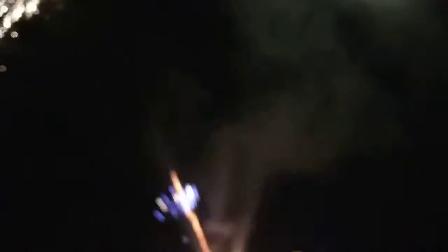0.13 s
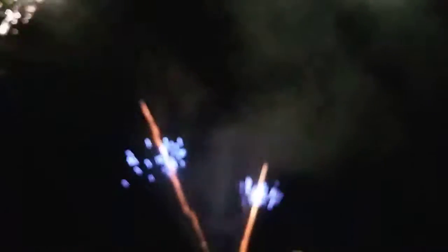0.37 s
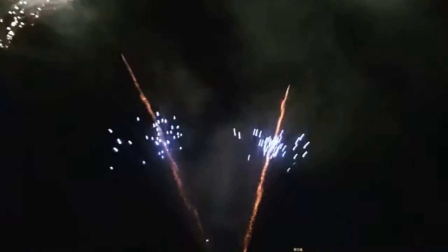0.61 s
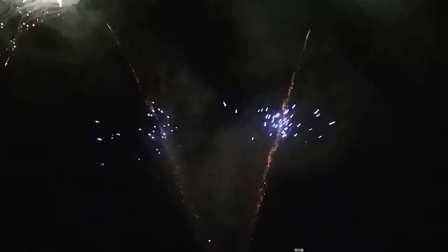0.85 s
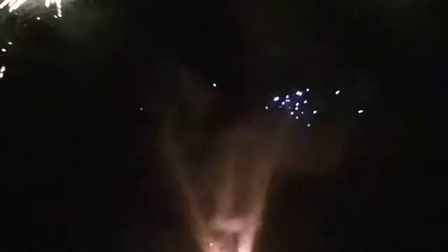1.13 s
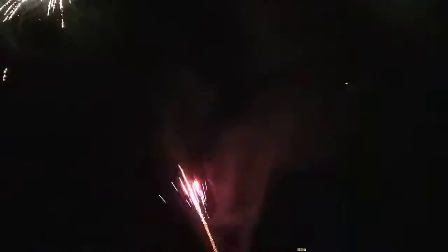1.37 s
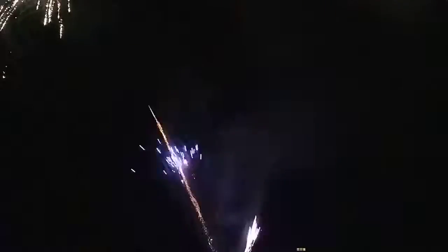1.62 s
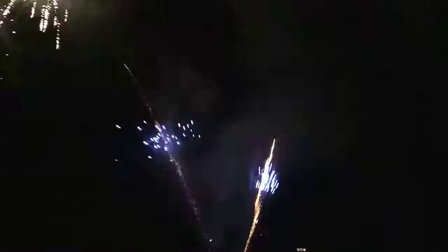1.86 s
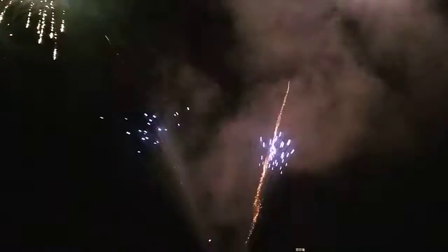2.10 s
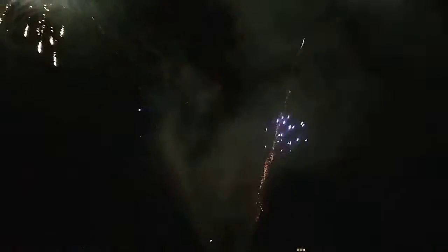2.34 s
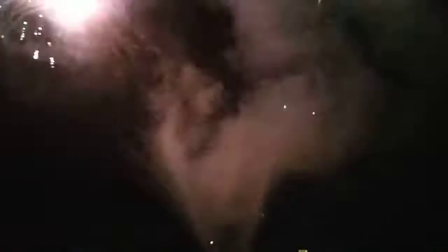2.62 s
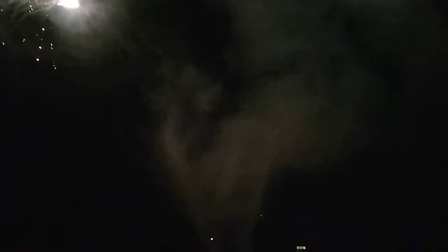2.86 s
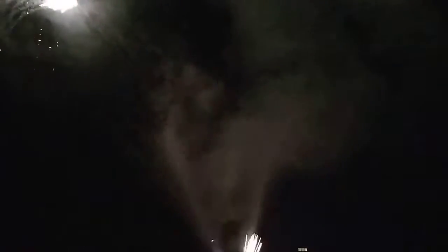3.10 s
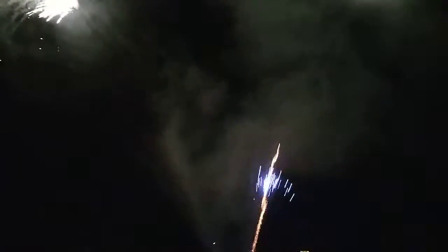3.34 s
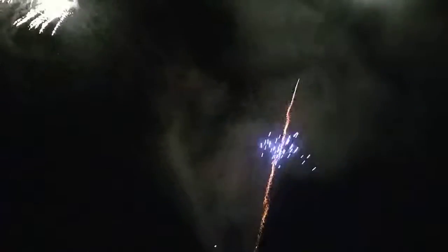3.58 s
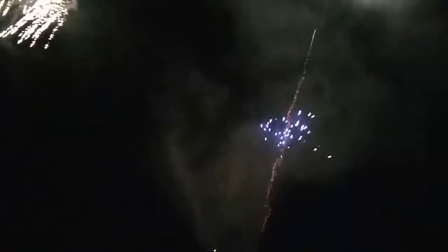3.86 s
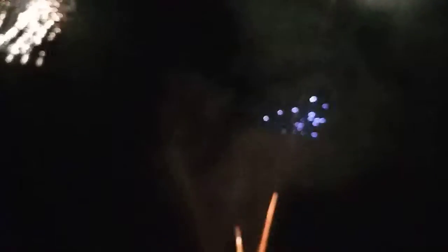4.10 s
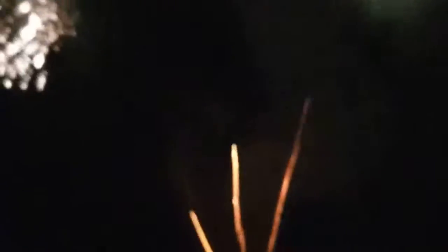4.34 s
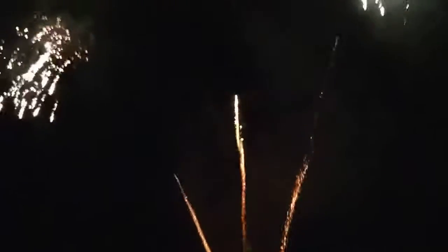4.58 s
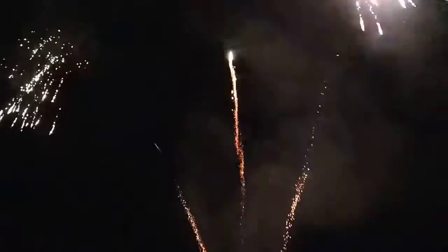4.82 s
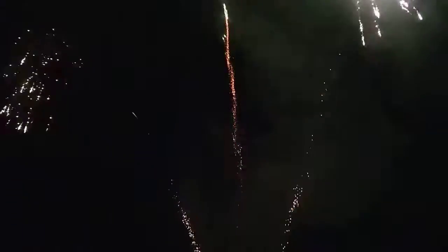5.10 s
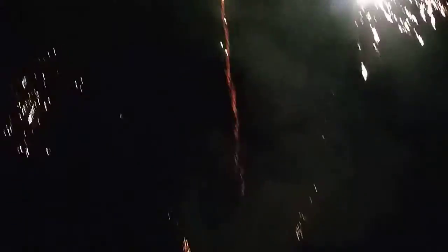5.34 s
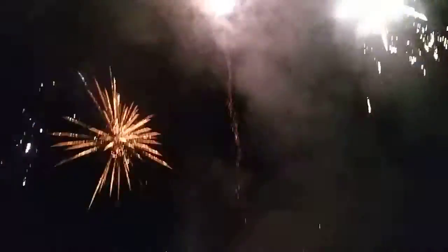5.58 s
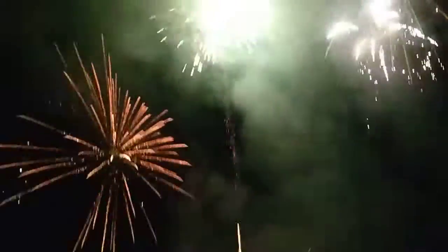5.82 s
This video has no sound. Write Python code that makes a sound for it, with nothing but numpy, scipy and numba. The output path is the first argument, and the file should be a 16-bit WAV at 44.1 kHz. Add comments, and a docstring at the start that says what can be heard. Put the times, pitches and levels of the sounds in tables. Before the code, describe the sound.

Outdoors at night, a phone tens of metres from firework mortars hears sharp, dry launch cracks with short thumps, each answered by clattering echoes from walls and trees. Single shots come first, with brief gritty fizzes and quiet gaps, then a tight cluster of launches near four seconds, faint distant pops, and finally overpowering overhead bangs that clip.

```python
"""Outdoors at night, some tens of metres from firework mortars, heard through a phone.
Each launch is a ringing crack of ragged noise with a low thump; each aerial burst is a steep shock front.
Walls, ground and trees answer every launch with one pattern of echoes and every burst with another:
banded noise, small rolling thumps and clear slaps. Gritty band noise hisses over a quiet, swelling night floor.
The phone cuts the bass, ducks the loudest shocks with a fast limiter and clips what is left."""
import sys
import numpy as np
from scipy import signal
from scipy.fft import rfft, irfft
from scipy.io import wavfile
from scipy.ndimage import uniform_filter1d
from numba import njit

SR = 44100
rng = np.random.default_rng(int(sys.argv[2]) if len(sys.argv) > 2 else 0)


def attenuation_scalar(level_db):
    """Turn a level in dB into a linear amplitude multiplier (20 dB per decade)."""
    decades = np.asarray(level_db, float) / 20
    return 10 ** decades


def wav_out(sig):
    """Save sig, one row per channel (or a flat mono array), as 16-bit PCM at SR to the path in sys.argv[1]."""
    wavfile.write(sys.argv[1], SR, np.round(np.clip(np.atleast_2d(sig).T, -1, 1) * 32767).astype(np.int16))


N = 262395

# signs that push the left and right channels apart: one row per channel
SIDES = np.array([[1], [-1]])


def along(table, hz):
    """Reads a (frequency [Hz], value) table on a log frequency axis."""
    points, values = np.transpose(table)
    return np.interp(np.log(hz + 1), np.log(points), values)


def colour(x, table, share=1):
    """Equalizes the last axis by a share of a (frequency [Hz], gain [dB]) table."""
    size = x.shape[-1]
    hz = np.arange(size // 2 + 1) * SR / size
    return irfft(rfft(x) * attenuation_scalar(share * along(table, hz)), size)


def unit(x):
    """Scales to rms 1."""
    return x / np.sqrt(np.mean(x ** 2))


def band_pass(x, hz, width):
    """Keeps a band of the given width, with hz as its geometric centre."""
    top = width / 2 + np.hypot(width / 2, hz)
    return signal.sosfilt(signal.butter(2, [top - width, top], "band", fs=SR, output="sos"), x)


def wide_noise(size, table):
    """Coloured stereo noise whose left and right agree, differ or oppose by frequency."""
    # stereo likeness: (frequency [Hz], correlation of left and right)
    likeness = [(60, 0.57), (130, 1), (290, 0.89), (640, 0.48), (1410, -0.22), (3090, -0.038), (6810, 0.06),
                (15000, -0.34)]
    alike = np.clip(along(likeness, np.arange(size // 2 + 1) * SR / size), -.99, .99)
    mid, side = rfft(rng.standard_normal((2, size)))
    spectrum = mid * np.sqrt(1 + alike) + SIDES * side * np.sqrt(1 - alike)
    return colour(irfft(spectrum, size), table)


def add(out, s, sound):
    """Mixes a sound in at s seconds, trimming what falls outside."""
    i = int(s * SR)
    part = sound[..., max(-i, 0):max(out.shape[-1] - i, 0)]
    out[..., max(i, 0):max(i, 0) + part.shape[-1]] += part


def walk(rate, size):
    """Random levels that glide to a new value every 1 / rate s; spread near 1."""
    k = int(SR / rate)
    held = np.repeat(rng.standard_normal(size // k + 1), k)
    return np.sqrt(3 / 2) * uniform_filter1d(held, k)[:size]


def night():
    """Distant outdoor hush: coloured noise that swells a little."""
    # colour of the night: (frequency [Hz], relative level [dB])
    night_colour = [(18, -68), (30, 7), (211, 1), (328, 1.5), (1270, -8), (2770, -10), (3230, -13.5),
                    (4540, -12.5), (5300, -11.5), (13500, -35.5), (15000, -21.5)]
    level_db, swell_db = -52.5, .8
    hush = unit(wide_noise(N + N % 2, night_colour))[:, :N]
    return attenuation_scalar(level_db + swell_db * walk(2.4, N)) * hush


def fizz():
    """Patches of gritty band noise: short hisses and one narrow, whistling breath."""
    # hiss patches: (start [s], length [s], level before the fades [dB], centre [Hz], width [Hz])
    patches = [(1.207, 0.093, -36, 3960, 3300), (1.371, 0.13, -33, 3520, 3000),
               (2.151, .06, -45.5, 5300, 2900), (4.702, 0.75, -49.5, 1900, 302),
               (4.882, 0.065, -29.5, 1890, 4200), (4.906, .011, -23, 5260, 3600)]
    grit_db = 5
    out = np.zeros((2, N))
    for s, length, db, hz, width in patches:
        t = np.arange(int(length * SR)) / SR / length  # 0 to 1 over the patch
        grit = rng.standard_normal((2, len(t))) * attenuation_scalar(grit_db * rng.standard_normal(len(t)))
        envelope = np.minimum(1, t / 0.2) * (1 - t) ** 0.8
        add(out, s, attenuation_scalar(db) * unit(band_pass(grit, hz, width)) * envelope)
    return out


def gas(alike):
    """Ragged stereo noise with the colour of the crack; alike sets how much both sides share."""
    # colour of the crack: (frequency [Hz], relative level [dB])
    crack_colour = [(410, -77.5), (700, 3), (1230, 2), (2690, -0.5), (3950, -1.5), (7320, -7),
                    (12100, -47.5), (13400, -34), (15000, -69)]
    draw = rng.standard_normal((3, 1024))
    return unit(colour(alike * draw[0] + (1 - alike) * draw[1:], crack_colour))


def shock(ms, swing, hz):
    """Pressure jumps, falls through zero and swings back ever more slowly; air rounds the front."""
    t = np.arange(4096) / SR * 1000 / ms  # in push lengths
    turns = 0.082 * t + 0.91 * (1 - np.exp(-t / 3))
    decay = np.exp(-t / (3.3 * swing)) + 0.025 * swing * np.exp(-t / 14)
    wave = np.cos(2 * np.pi * turns) * decay
    return signal.sosfilt(signal.butter(2, min(hz, 12000), fs=SR, output="sos"), wave)


def thump():
    """A dull shock arriving just behind the crack."""
    return np.pad(shock(1.95, 0.68, 1500), (58, 0))


def knock():
    """The short coloured ring of a crack thrown back by a wall: decaying sines."""
    # partials: (frequency [Hz], level [dB], time to fall 60 dB [s])
    partials = [(1000, -5, .018), (2280, 1, .026), (3150, -4, .016)]
    t = np.arange(2048) / SR
    return sum(attenuation_scalar(db - 60 * t / t60) * np.sin(2 * np.pi * hz * t) for hz, db, t60 in partials)


def scatter(belts, top_db):
    """Diffuse stereo echo: noise bands that swell and fade belt by belt."""
    # colour of the scatter, each band being levelled afterwards: (frequency [Hz], relative level [dB])
    scatter_colour = [(24, -26), (40, 16), (145, 8), (422, -2.5), (597, -7), (1140, -1), (1320, -5),
                      (1820, -3), (2280, -0.5), (3220, -5), (6460, -11), (13900, -36), (15000, -58)]
    # frequencies that split the scatter into bands: (edge [Hz])
    edges_hz = [250, 1200, 4000, 8000]
    # bands from low to high: (strength [dB], loss in air [dB/s], negative slows the fade)
    bands = [(-12, 7), (-1, -8.5), (-1.2, 1), (-3.5, 10.5), (-18, 58)]
    lumpy_db = 2.2  # unevenness
    size = int(1.3 * SR) // 2 * 2
    t, hz = np.arange(size) / SR, np.arange(size // 2 + 1) * SR / size
    spectrum = rfft(wide_noise(size, scatter_colour))
    below = [0] + [1 / (1 + (hz / edge) ** 4) for edge in edges_hz] + [1]
    out = 0
    for k, (band_db, air_db) in enumerate(bands):
        power = 0
        for s, rise, fall_db, db, tilt_db in belts:
            build_up = np.exp(-(np.minimum(t - s, 0) / rise) ** 2)
            fall = attenuation_scalar(db + tilt_db * (k - 2) - fall_db * np.maximum(t - s, 0))
            power = power + (build_up * fall) ** 2
        band = unit(irfft(spectrum * (below[k + 1] - below[k]), size))
        lift_db = top_db * (k == len(edges_hz))  # top band only
        level_db = band_db + lift_db - air_db * t + lumpy_db * walk(90, size)
        out = out + band * np.sqrt(power) * attenuation_scalar(level_db)
    return out * (t > .006) * np.minimum(1, (t[-1] - t) / 0.25)


def surroundings(belts, slaps, roll_db, top_db=0):
    """The stereo echo of one bang: scatter, small thumps from scattered faces and clear wall slaps."""
    rolls, roll_fall_db_s = 45, 25  # count, fall with delay [dB/s]
    wall_hz, wall_width_hz = 2040, 2730  # band that the walls return best
    ring_db = 3  # the knock of a slap over its grain
    out = scatter(belts, top_db)
    for place, strength, side in rng.random((rolls, 3)):
        s = .03 + 0.47 * place
        level_db = roll_db - roll_fall_db_s * s - 9.7 * strength + 5 * (side - .5) * SIDES
        add(out, s, attenuation_scalar(level_db) * thump())
    ms = (np.arange(1024) - 512) / SR * 1000
    for s, crack_db, thump_db, smear in slaps:
        # a rough wall smears the crack into a grainy burst centred on the delay
        grain = unit(band_pass(gas(0.5), wall_hz, wall_width_hz)) * np.exp(-(ms / smear) ** 2)
        add(out, s - 512 / SR, attenuation_scalar(crack_db) * grain)
        add(out, s, attenuation_scalar(crack_db + ring_db) * knock())
        add(out, s, attenuation_scalar(thump_db) * thump())
    return out


def echoes(ground, sky):
    """Answers the launch and burst impulses, each train with its own surroundings, by convolution."""
    # belts of ground, trees and houses that scatter a launch:
    # (peak [s], build-up [s], fall [dB/s], peak level [dB], tilt [dB per band])
    belts = [(.012, 0.0081, 899, -38.5, -1), (.05, 0.014, 21.5, -41, 0), (.08, 0.054, 201, -34, 2.5),
             (.205, 0.018, 46.5, -39.5, 2.5), (.42, .05, 90, -61.5, -16), (.525, 0.031, 110, -45, 0.5)]
    # the same for a burst overhead, same columns
    sky_belts = [(.033, 0.012, 160, -34.5, 1.5), (.11, 0.065, 33, -37, 0), (.31, .09, 260, -42.5, -3)]
    # distinct wall echoes of a launch: (delay [s], crack [dB], thump [dB], smear [ms])
    slaps = [(0.065, -33, -38, 3.4), (0.074, -26.5, -52, 2.3), (0.0788, -21, -26.5, 2.2),
             (.212, -44, -31, 6.6), (0.243, -50.5, -37, 3.9), (.260, -41.5, -28, 4.6),
             (0.364, -49, -36, 1.6), (0.421, -62, -37, 1.3), (0.458, -65, -45, 1.6),
             (0.5259, -36, -29.5, 1.4), (0.546, -45, -38, 6.2), (0.559, -40, -41, 0.7)]
    # the same for a burst, same columns
    sky_slaps = [(.0835, -29, -36, 2.2)]
    out = signal.fftconvolve(ground, surroundings(belts, slaps, roll_db=-36), axes=1)
    # bursts overhead keep more of the top treble
    out += signal.fftconvolve(sky, surroundings(sky_belts, sky_slaps, roll_db=-30, top_db=10.5), axes=1)
    return out[:, SR:SR + N]  # the trains start 1 s early


def crack():
    """The launch crack: a suction spike, a short ring near 2.4 kHz and a few ms of ragged gas."""
    ring_hz = 2367
    t = np.arange(1024) / SR
    ring = -np.sin(2 * np.pi * ring_hz * t) * np.exp(-t / 0.00051)
    return ring + gas(0.61) * (0.27 * np.exp(-(t / 0.0028) ** 2) + 0.026 * np.exp(-t / 0.01))


def click_and_swell():
    """A faint click, then noise swelling for 5.6 ms up to the crack."""
    t = np.arange(1024) / SR
    return crack() + .5 * gas(0.31) * np.where(t < .0056, (t / 0.0061) ** 2, 0)


def launches():
    """Mortars firing: click and swell, crack and thump, plus the impulses that the ground answers."""
    # mortar launches: (time [s], crack [dB], thump [dB], click and swell just before [dB], echo [dB])
    shots = [(-.025, -3, 10, -44, -1), (.2130, 0, -3.5, -7.5, -1.5), (1.1880, 8, 0.5, -7.5, -1.5),
             (1.547, -1.5, -8.5, -21.5, -4.5), (3.0990, 1, -5, -16.5, -2), (3.9867, 5, -2, -34, 2.5),
             (4.014, 2.5, -7.5, -35, -4.5), (4.0800, 0.5, -7, -16, -3), (5.4953, 19, 14, -24, -4.5),
             (5.8554, 3, -4.5, -27, 0.5)]
    direct, ground = np.zeros((2, N)), np.zeros((1, N + SR))
    for s, crack_db, thump_db, click_db, echo_db in shots:
        add(direct, s, attenuation_scalar(crack_db) * crack())
        add(direct, s - .0056, attenuation_scalar(click_db) * click_and_swell())
        add(direct, s, attenuation_scalar(thump_db) * thump())
        add(ground, s + 1, attenuation_scalar(np.array([[echo_db]])))
    return direct, ground


def bursts():
    """Aerial bursts: direct and bounced shock fronts, plus the impulses that their echoes answer."""
    # shock fronts: (time [s], peak before rounding [dB], push length [ms], sign, echo [dB])
    fronts = [(2.7132, -28, 1.5, 1, -56), (2.7193, -26, 1.4, 1, -40), (2.7255, -33, 1.2, 1, -41),
              (2.7299, -40, 2.3, 1, -70), (4.8872, -21.5, 1.7, 1, -35), (4.8952, -18, 2.7, 1, -24.5),
              (4.8989, -25, 1.1, 1, -33), (4.9115, -13.5, 0.52, 1, -39), (4.9128, -19, 0.72, 1, -30),
              (4.9193, -16.5, 0.71, 1, -20), (5.4994, 10.5, 2.1, 1, 19), (5.5017, 11.5, 2.3, -1, 0),
              (5.5070, 7, 3.1, -1, 1), (5.5153, 6, 1.1, 1, 5), (5.5177, 0, 2.3, -1, 0),
              (5.5259, 6, 2.2, -1, 6.5), (5.6594, 9, 2, 1, 14.5), (5.6675, 14, 5.5, 1, -0.5),
              (5.690, -5, 0.73, 1, -5), (5.761, 0, 0.85, 1, 0)]
    swing_ms, swing_most, bounced_swing = .55, .8, .4
    direct, sky = np.zeros((2, N)), np.zeros((1, N + SR))
    for s, db, ms, sign, echo_db in fronts:
        # short pushes swing back more, inverted bounces all alike
        swing = min(swing_ms / ms, swing_most) if sign > 0 else bounced_swing
        front_hz = 4500 * attenuation_scalar(0.2 * db)  # far bursts are both weaker and duller
        add(direct, s, np.sign(sign) * attenuation_scalar(db) * shock(ms, swing, front_hz))
        add(sky, s + 1, attenuation_scalar(np.array([[echo_db]])))
    return direct, sky


def scene():
    """The night, hiss patches, echoes, launches and bursts together."""
    launch_sound, ground = launches()
    burst_sound, sky = bursts()
    return night() + fizz() + echoes(ground, sky) + launch_sound + burst_sound


@njit
def limit(x, top, release, ahead):
    """Limiter gain: falls at once for a coming peak on either side and recovers slowly."""
    gain, e = np.ones(x.shape[1]), 0.
    for i in range(x.shape[1] - ahead):
        e = max(e * release, abs(x[0, i + ahead]), abs(x[1, i + ahead]))
        gain[i] = min(1., top / (e + 1e-18))
    return gain


def band_limit(x):
    """A steep low-pass at the top of the band."""
    return signal.sosfilt(signal.butter(12, 15580, fs=SR, output="sos"), x)


def record(dry):
    """The phone: ports that differ in treble, a bass cut, a fast limiter and a hard ceiling."""
    # port difference: (frequency [Hz], left minus right [dB])
    tilt = [(60, -1.0), (110, -1.0), (200, -1.0), (380, -1.0), (700, -1.5), (1290, -0.5), (2380, 0.5),
            (4390, 2.0), (8110, 4.5), (15000, 2.0)]
    ports = [colour(np.pad(v, (0, N % 2)), tilt, share)[:N] for v, share in zip(dry, (.5, -.5))]
    x = signal.sosfilt(signal.butter(2, 50, "high", fs=SR, output="sos"), np.array(ports))
    gain = limit(x, 1.37, np.exp(-1 / (0.016 * SR)), 20)  # 16 ms release, 20 samples ahead
    x = np.clip(x * uniform_filter1d(gain, 20), -1, 1)
    return band_limit(x)


dry = scene()
out = record(dry)
wav_out(out)
```